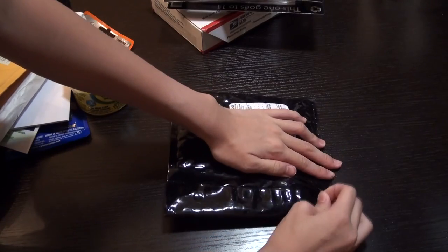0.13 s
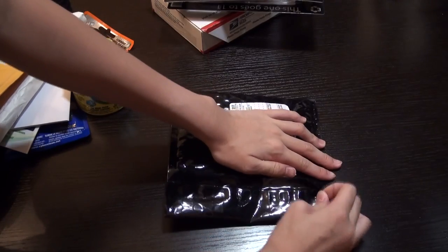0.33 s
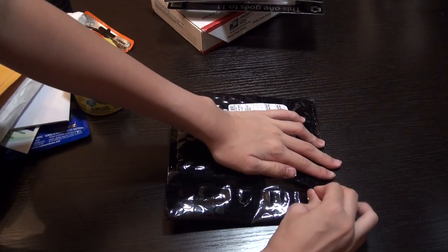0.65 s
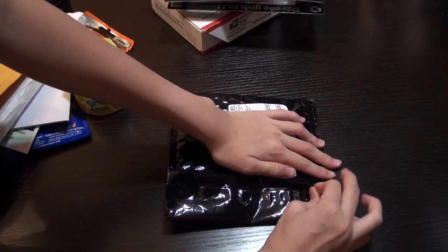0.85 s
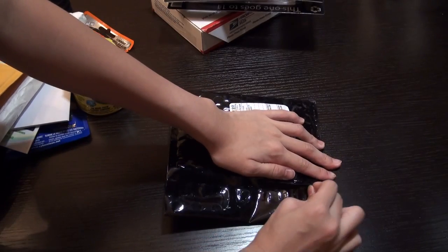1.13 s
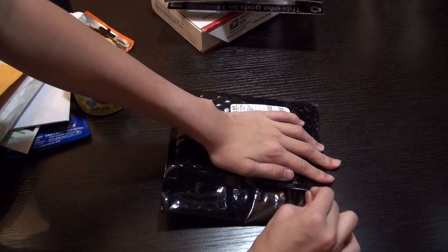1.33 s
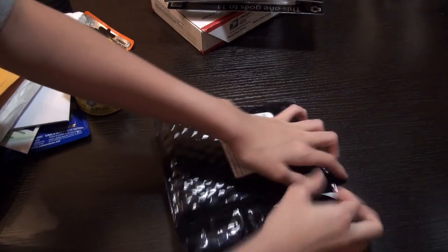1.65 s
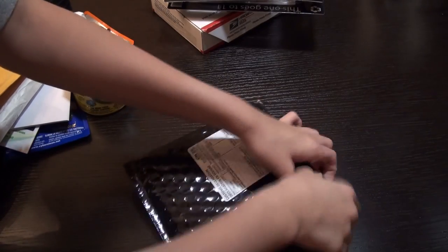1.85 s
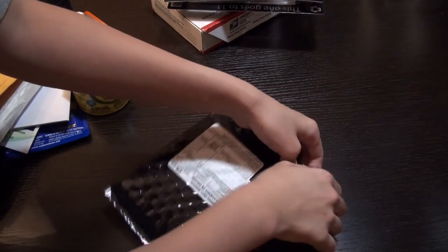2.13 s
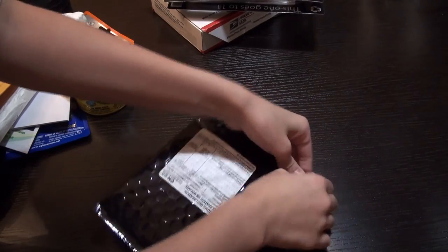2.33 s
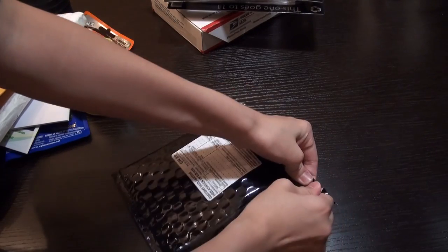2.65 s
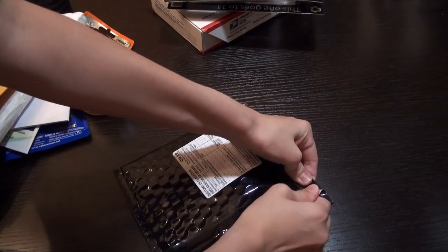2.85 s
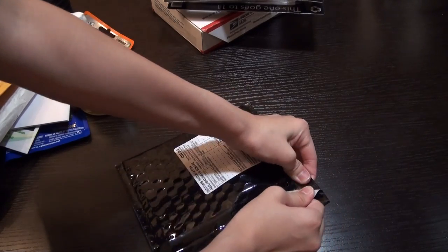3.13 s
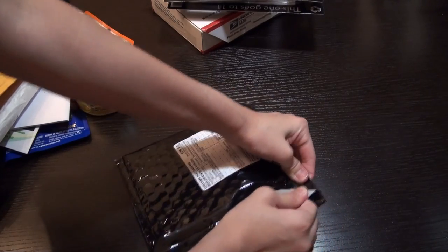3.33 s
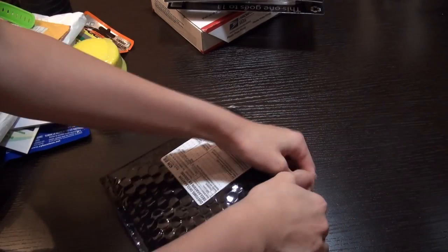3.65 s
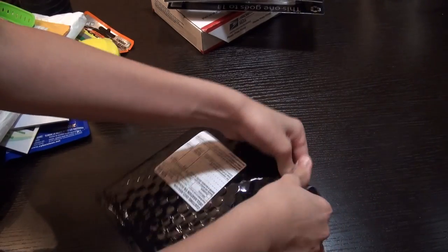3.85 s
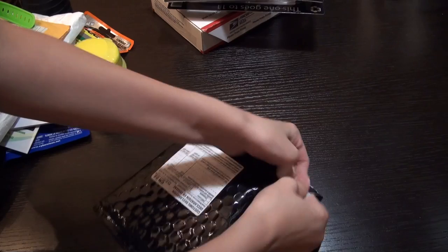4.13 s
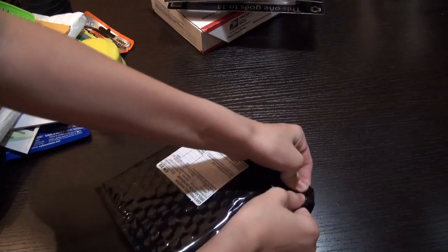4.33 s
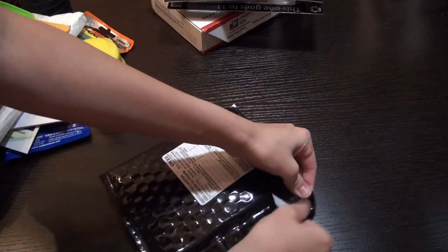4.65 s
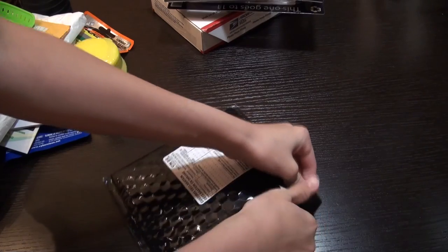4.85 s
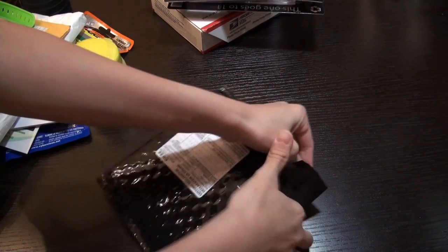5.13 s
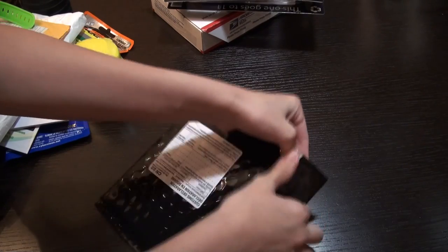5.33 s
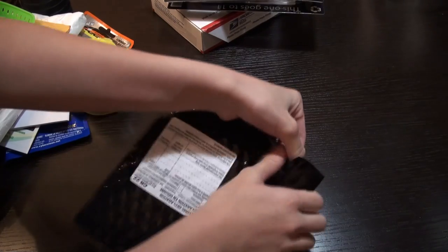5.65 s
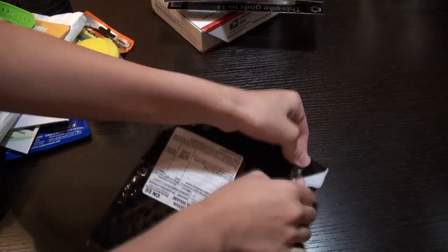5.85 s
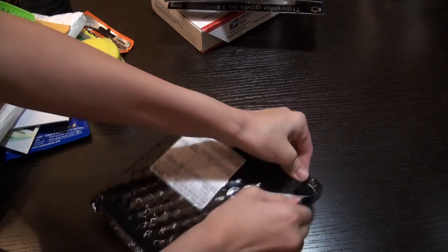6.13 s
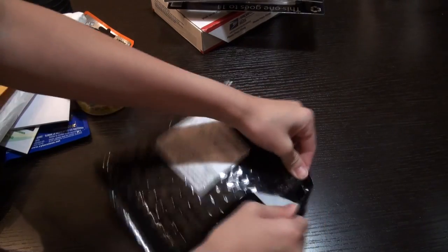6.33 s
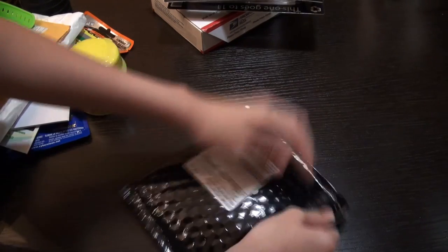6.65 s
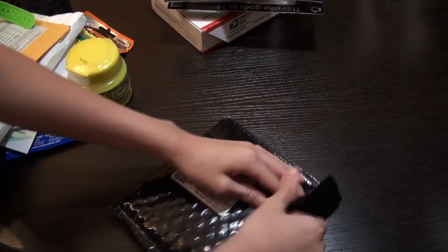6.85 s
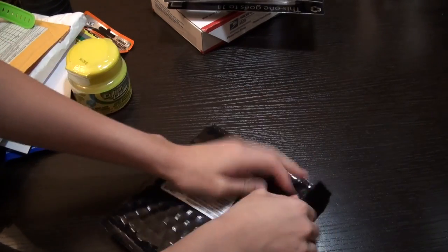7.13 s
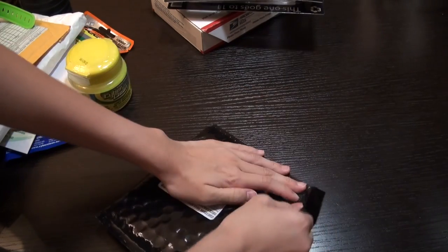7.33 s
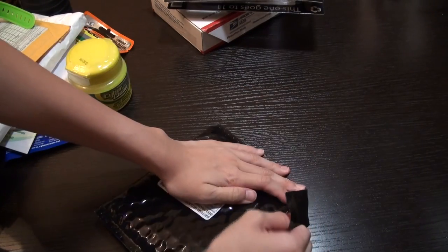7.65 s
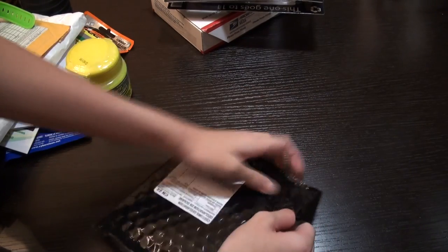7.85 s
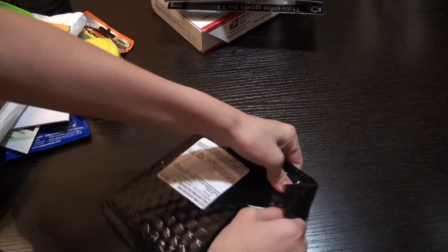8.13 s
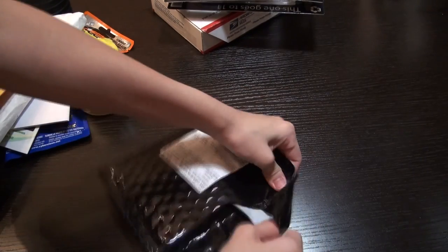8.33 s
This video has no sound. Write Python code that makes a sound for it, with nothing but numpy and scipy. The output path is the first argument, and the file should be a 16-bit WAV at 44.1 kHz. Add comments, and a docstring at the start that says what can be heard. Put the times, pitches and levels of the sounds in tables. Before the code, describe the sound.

Hands pull at a padded plastic envelope, making sharp crackles, short rips and soft desk bumps above a faint room hum.

```python
"""Plastic film rustles over a faint hum and hiss as hands pull and tear a bubble mailer on a desk.
The rustle is thousands of tiny creases, merging into a rip under hard tugs. The bag thumps the desk.
Larger creases snap one by one: a sharp edge, a flex of the film, a ring of the air-filled pouch.
The desk top and a small room answer. The microphones are close; the right one is weak."""
import sys
import numpy as np
from scipy import signal
from scipy.fft import rfft, irfft
from scipy.io import wavfile
from scipy.ndimage import uniform_filter1d

SR = 44100
rng = np.random.default_rng(int(sys.argv[2]) if len(sys.argv) > 2 else 0)


def transcribe(signal):
    """Save signal, clipped to [-1, 1], as a 16-bit WAV file at the path in sys.argv[1]."""
    frames = np.atleast_2d(signal).T
    limited = np.clip(frames, -1, 1)
    pcm = np.round(limited * 32767).astype(np.int16)
    wavfile.write(sys.argv[1], SR, pcm)


N = 374850


def amp(db):
    return 10 ** (np.asarray(db) / 20)


def decay(t, t60_s):
    return amp(-60 * t / t60_s)


def unit_rms(x):
    return x / np.sqrt(np.mean(x ** 2) + 1e-20)


def curve_at(points, hz):
    """Interpolates (hz, value) points over log frequency."""
    point_hz, value = np.transpose(points)
    return np.interp(np.log(hz + 1), np.log(point_hz + 1), value)


def coloured(x, spectrum):
    """Minimum-phase filter of unit energy."""
    log_gain = np.log(amp(curve_at(spectrum, abs(np.fft.fftfreq(4096, 1 / SR)))))
    taps = np.fft.ifft(np.exp(log_gain - 1j * signal.hilbert(log_gain).imag)).real[:1024]
    taps = taps / np.linalg.norm(taps)
    return signal.oaconvolve(np.atleast_2d(x), taps[None], axes=1)[:, :x.shape[-1]].squeeze()


def burst(level_db, x):
    """Scales x to the energy of 3 ms at level_db."""
    return amp(level_db) * x * np.sqrt(.003 * SR) / np.linalg.norm(x)


# Fingers working the film: time_s, level_db, pouch_rel_db, edge_rel_db
HANDLING = [(0, -51, -4, -5), (.4, -62, 3, -14), (.73, -66, 3, -5), (1.08, -55.5, 0, -6),
            (1.24, -62.5, 2, -11), (1.8, -50.5, 2.5, -6.5), (2.3, -61.5, 5, -5), (2.53, -45, -2.5, -4),
            (2.93, -62, -1.5, -3.5), (3.2, -63, 1.5, -6), (3.76, -53.5, 0.5, -9), (4.07, -64, 0.5, -9),
            (4.45, -48, -13, -6.5), (4.7, -67.5, 7, -16), (5.09, -53.5, -3, -3.5), (5.75, -60.5, 4, -6),
            (6.08, -47.5, 0.5, -3.5), (6.42, -47, 1.3, -8), (6.72, -61, 2.5, -6), (6.95, -61, 4, -5),
            (7.45, -52, 2.5, -2), (7.8, -56, 6.5, -3.5), (8.21, -54, -1.5, -6), (8.5, -36.5, -3, -8)]
# Tugs that drag or rip the film: start_s, length_s, peak_db, pouch_rel_db, edge_rel_db
TUGS = [(0.445, 0.013, -55, 2, 8.5), (1.583, 0.054, -43.5, 4.5, 2), (1.857, 0.056, -44.5, 4, -9),
        (1.976, 0.051, -42, -8, -4.5), (2.298, 0.066, -45.5, 5, -14), (2.46, 0.053, -49, 1, -7),
        (2.58, 0.11, -48.5, 1.5, -7), (3.473, 0.19, -49.5, -2, -1), (3.875, 0.039, -53, 0, -0.5),
        (4.153, 0.18, -43.5, 2, 6), (4.478, .07, -38.5, -1, -1), (4.883, 0.052, -43.5, -1, 2.5),
        (5.296, 0.042, -53.5, 7.5, -4), (5.463, 0.13, -42.5, 5, -24), (5.828, 0.078, -46.5, 6, 5),
        (6.207, .11, -30, 3.5, -1.5), (6.502, 0.087, -39.5, 1.5, -3), (6.801, 0.025, -42.5, 3, -3),
        (7.19, 0.14, -47.5, -4, -4), (7.476, 0.036, -49.5, 2, 1.5), (7.62, 0.055, -49, -12, 0),
        (7.855, 0.087, -44.5, 4.5, -2), (8.068, 0.053, -43.5, 1.5, -6), (8.282, 0.035, -41.5, 7, 2),
        (8.374, 0.095, -33.5, 2.5, 0.5)]
def handling_levels(swell_db=23, slacken_db_per_s=263, settle_rel_db=-23, settle_db_per_s=160):
    """Film, pouch and edge levels in dB: fingers, tugs and settling after snaps add in power."""
    t = np.arange(0, N + 64, 64) / SR
    time_s, level_db, pouch_rel_db, edge_rel_db = np.transpose(HANDLING)
    power = amp([np.interp(t, time_s, level_db + rel) for rel in (0, pouch_rel_db, edge_rel_db)]) ** 2
    for start_s, length_s, peak_db, pouch_rel_db, edge_rel_db in TUGS:
        to_go = 1 - (t - start_s) / length_s
        shape_db = np.where(to_go > 0, -swell_db * to_go ** 2, slacken_db_per_s * length_s * to_go)
        parts_db = peak_db + shape_db + np.vstack([0, pouch_rel_db, edge_rel_db])
        power += amp(np.maximum(parts_db, -200)) ** 2
    for start_s, level_db, pouch_rel_db, edge_rel_db, _ in SNAPS:
        settling_db = level_db + settle_rel_db - settle_db_per_s * abs(t - start_s)
        power += (t > start_s) * amp(settling_db + np.vstack([0, pouch_rel_db, edge_rel_db])) ** 2
    return [np.interp(np.arange(N) / SR, t, 10 * np.log10(part)) for part in power]


# Spectra of flexing film, air-filled pouch and a crease's sharp edge: freq_hz, gain_db
FILM = [(1800, -12.5), (2800, 4.5), (3800, 5.5), (5500, 2), (8000, -5.5), (16000, -22.5)]
POUCH = [(60, -45), (200, -39.5), (400, -12.5), (800, -5.5), (1250, 2.5), (2200, -1), (3200, -9),
         (8000, -86)]
EDGE = [(3000, -42), (5000, -0.5), (7000, 2), (10000, 3.5), (13000, 0.5), (16500, -17)]
def rustle(rip_db=-45, rub_share=0.61):
    """Tiny creases of uneven size, in clumps; hard handling merges them into an even rip."""
    film_db, pouch_db, edge_db = handling_levels()
    creases_per_s = np.clip(1100 * amp(0.56 * (film_db + 50.5)), 120, 30000)
    unevenness = 1 - .8 / (1 + amp(3 * (rip_db - film_db)))
    clumps = 5 * unit_rms(uniform_filter1d(rng.standard_normal(N), size=500))
    spread = 4.5 * (np.minimum(rng.exponential(1, N), 3.1) - 1.5)
    size = amp(unevenness * (spread + clumps))
    ticks = size * (rng.random(N) < creases_per_s / SR) / np.sqrt(creases_per_s)
    parts = (FILM, film_db, .003), (POUCH, pouch_db, .005), (EDGE, edge_db, .002)
    out = 0
    for spectrum, level_db, t60_s in parts:
        part_ticks = ticks * amp(5.9 * unevenness * rng.standard_normal(N))
        envelope = signal.lfilter([1], [1, -decay(1 / SR, t60_s)], part_ticks)
        crackle = envelope * rng.standard_normal(N)
        rub = rub_share * rng.standard_normal(N) * np.std(crackle)  # skin sliding on film
        out += amp(level_db) * unit_rms(coloured(crackle + rub, spectrum))
    return out


def wander(top_hz):
    """Slow random curve, rms 1."""
    t = np.arange(0, N + 400, 400) / SR
    rates_hz = np.geomspace(.4, top_hz, num=16)
    slow = sum(np.sin(2 * np.pi * (hz * t + rng.random())) / np.sqrt(hz) for hz in rates_hz)
    return np.interp(np.arange(N) / SR, t, unit_rms(slow))


# Hum tones: pitch_hz, rms_db
HUM_TONES = [(54.5, -67.5), (76.7, -98), (97.6, -98), (101.6, -62.5), (108.3, -60), (130.5, -68)]
def hum(waver_db=1.5, drift_hz=.35):
    """Low tones that beat against each other and waver a little."""
    out = 0
    for pitch_hz, rms_db in HUM_TONES:
        peak = np.sqrt(2) * amp(rms_db + waver_db * wander(2.9))
        cycles = np.cumsum(pitch_hz + drift_hz * wander(4.0)) / SR
        out += peak * np.sin(2 * np.pi * cycles)
    return out


# Noise floor spectrum: freq_hz, density_db
HISS_SPECTRUM = [(32, -9), (42, -12), (110, 1), (190, -10.5), (870, -12), (1200, -15), (2000, -17),
                 (5900, -21), (10700, -26), (15700, -31), (17000, -32)]
# Left-right likeness of the hiss: freq_hz, correlation
HISS_CORRELATION = [(60, 0.52), (240, 0.64), (1000, 1), (15000, 0.38)]
def hiss(level_db=-54.5):
    """Steady room and microphone noise, partly shared by both channels."""
    hz = np.fft.rfftfreq(N, 1 / SR)
    left, independent = rfft(rng.standard_normal((2, N)))
    correlation = curve_at(HISS_CORRELATION, hz)
    right = correlation * left + np.sqrt(1 - correlation ** 2) * independent
    shaped = np.array([left, right]) * amp(curve_at(HISS_SPECTRUM, hz))
    return amp(level_db) * unit_rms(irfft(shaped, N))


# Knock spectrum of the desk top: freq_hz, gain_db
DESK = [(90, -10), (180, -6.5), (380, -1.5), (600, 3.5), (1200, -17)]
# Jerks of the bag against the desk: start_s, level_db
THUMPS = [(0.0084, -44), (0.1443, -30.5), (0.9157, -27), (1.605, -31), (1.6248, -43.5), (3.641, -30.5),
          (4.1235, -37.5), (5.1734, -23.5), (5.5873, -36), (5.93, -33), (6.2462, -30), (6.266, -37),
          (6.4962, -28.5), (6.5618, -33), (6.594, -39), (7.937, -29), (8.436, -38)]
def thumps(t60_s=.014):
    """The padded bag pushes softly into the desk top for a few milliseconds."""
    t, out = np.arange(900) / SR, np.zeros(N + 900)
    pushes = coloured(decay(t, t60_s) * rng.standard_normal((len(THUMPS), len(t))), DESK)
    fade_out = signal.windows.tukey(2 * len(t), .5)[len(t):]
    for (start_s, level_db), push in zip(THUMPS, pushes):
        out[round(start_s * SR):][:len(t)] += burst(level_db, push * fade_out)
    return out[:N]


# Creases that snap clearly: start_s, level_db, pouch_rel_db, edge_rel_db, pouch_pitch_hz
SNAPS = [(0.0111, -21.5, -1, -0.5, 1260), (0.144, -25, -1.5, 0, 1030), (0.1645, -28, -4, 0, 2110),
         (0.1682, -31, -4.5, 8.5, 735), (0.1942, -45, 14, -12, 1210), (0.218, -31.5, -7, -2, 1450),
         (0.2538, -32.5, -4, -2, 1790), (0.2634, -41.5, 5, 6, 1730), (0.332, -26.5, -1.5, 0.5, 1600),
         (0.345, -41, 3, 14, 1520), (0.3624, -34, -11, -2, 1540), (0.4913, -42, -4, -14, 1190),
         (0.524, -53.5, 7, -11, 1390), (0.5546, -44.5, 3, -4, 1430), (0.6101, -35.5, -11, -6, 1420),
         (0.789, -35, -6, -31, 1510), (0.9169, -22.5, 1.5, 0, 2010), (1.0961, -43.5, -2, -5, 1410),
         (1.1576, -44.5, 0, -7, 1380), (1.207, -55, 13.5, -19, 1224), (1.286, -42.5, 0, -3, 1400),
         (1.3041, -42, 8.5, 2, 1440), (1.415, -33, 4, -12, 1490), (1.4425, -34.5, 5.5, -5, 1460),
         (1.4679, -37.5, 7.5, -3.5, 1480), (1.5525, -39, 4, -12, 1280), (1.6052, -27, 5.5, -17, 1450),
         (1.6259, -29.5, 7, -21, 1600), (1.631, -28, -7, -14, 2010), (1.7406, -32.5, 1, -7.5, 1380),
         (1.7994, -30.5, 5.5, 3.5, 1430), (1.9948, -33.5, 5, -7, 1740), (2.0601, -38.5, 10.5, -4, 1770),
         (2.0666, -33, 3.5, -4, 1780), (2.349, -47, 14, -4, 1280), (2.3599, -39, 10, -27, 2430),
         (2.3912, -38.5, 4, -20, 1570), (2.469, -24.5, 2.5, -18, 2480), (2.499, -40, 11, -22, 1310),
         (2.5131, -37, 7.5, -24, 2470), (2.5167, -27, -2, -23, 2700), (2.5633, -44.5, 14.5, -10, 1540),
         (2.6074, -27.5, -2, 7.5, 2630), (2.7374, -39.5, -8, -11, 1390), (2.9315, -48, -4, 6, 1520),
         (3.0925, -31.5, 1.5, 2.5, 1290), (3.23, -46.5, -6, -6, 1400), (3.245, -48.5, 5, -14, 1370),
         (3.279, -42, -25, -24, 2500), (3.366, -43, -1, 5.5, 1730), (3.56, -33.5, 3, -5, 1550),
         (3.642, -31, 8, -3, 1320), (3.7363, -42, -9, 4.5, 2500), (4.0124, -47, 8.5, -1, 1250),
         (4.081, -59.5, 23.5, -10, 1180), (4.11, -62, 22, -10, 1250), (4.1236, -55, 20, -9, 1200),
         (4.2256, -42.5, 4, 0, 1220), (4.2604, -44, 4.5, 8, 1380), (4.2735, -42.5, -13, 21.5, 1400),
         (4.2932, -43, -15, 22.5, 1410), (4.297, -34, -8, 11.5, 2020), (4.305, -32.5, -0.5, 7.5, 2000),
         (4.3431, -39.5, 5.5, -15, 1170), (4.394, -29.5, 0.5, -25, 1390), (4.4395, -44, -3, 3, 1310),
         (4.4576, -29, -1.5, 1, 1560), (4.5047, -28, 8, -19, 1214), (4.5205, -20, -9, -10, 2640),
         (4.5278, -22, -7, -14, 1330), (4.5424, -26.5, 1.5, 1, 1650), (4.622, -48.5, 17.5, -12, 1210),
         (4.7833, -25, -5, -11, 1970), (4.8056, -35.5, 8, 0.5, 1130), (4.8098, -31, 1, -12, 1410),
         (4.8729, -35, 3.5, -9, 1150), (4.8981, -28.5, 8, 5, 1300), (4.9007, -26.5, -4.5, 1, 1410),
         (4.973, -32.5, -2, -8, 890), (5.0123, -40, 15.5, -20, 1150), (5.0628, -43, 2, -16, 2100),
         (5.1735, -27.5, 5.5, -23, 1330), (5.1776, -22, -10.5, -14, 1380), (5.3337, -37.5, -1, -8, 830),
         (5.4888, -49, 11, -18, 1290), (5.547, -43.5, 14.5, -31, 2250), (5.5737, -28, -9, -23, 1070),
         (5.5923, -31.5, 5.5, -20, 1660), (5.6672, -49.5, 13, 0, 1060), (5.8675, -30.5, 2, -3, 1670),
         (5.9026, -39, 8.5, 1, 1200), (5.9171, -28, -1, -9, 1250), (5.93, -29.5, -7, 6, 2370),
         (5.945, -34.5, 7.5, -7, 1960), (6.0395, -34, -1.5, -21, 1320), (6.125, -37, 3, -6, 1520),
         (6.1518, -35, 6.5, -3, 1310), (6.2207, -29, 0.5, -2.5, 1240), (6.2493, -44, 20, -9, 1190),
         (6.2558, -20.5, 1, -3, 1180), (6.2625, -29.5, 9, -10, 1410), (6.264, -24, 5, -1.5, 1090),
         (6.4596, -35.5, 0.5, 3.5, 1060), (6.472, -39, 4, -5, 1400), (6.5002, -35.5, 7, -15, 1520),
         (6.5134, -44, 13, -3, 1490), (6.531, -36.5, -1, 4, 1490), (6.5578, -33.5, -1, 6, 2320),
         (6.5613, -26, -1, 4, 2400), (6.5708, -30, -13, 3.5, 1220), (6.596, -47, 11, -5, 1150),
         (6.8449, -44, 10, 3, 1330), (6.9727, -54, 16, -28, 1110), (7.0002, -44, -1.5, -11, 1820),
         (7.1085, -37.5, 0.5, -10, 1220), (7.2316, -40, -1.5, -12, 1400), (7.274, -40.5, 3, -3, 1180),
         (7.2964, -34, 3, -2.5, 1270), (7.4273, -40.5, 5.5, -5, 1180), (7.5141, -43, 6.5, 3, 1620),
         (7.5659, -55.5, 23, 2, 1160), (7.6244, -25.5, 5, -4, 1255), (7.633, -28.5, 5.5, 2, 1060),
         (7.8703, -38, 8, -5, 1280), (7.937, -28.5, 4, -12, 1070), (8.046, -39, 10, -35, 1700),
         (8.1537, -33.5, 0, -20, 1320), (8.24, -49.5, 13.5, 5, 1920), (8.2955, -24.5, 4.5, -16, 1770),
         (8.3162, -23.5, 3.5, -0.5, 1190), (8.3509, -32, 6.5, 0, 1610), (8.365, -40, 11, -25, 2120),
         (8.3925, -39, -1, 3, 1750), (8.3988, -32.5, 4, 0, 965), (8.4116, -28, 9, 4, 1280),
         (8.4352, -20.5, 2, -8, 1170), (8.4944, -29, 2, -6, 2100)]
def snaps():
    """A crease lets go at once: bright edge, flex of the film, short ring of the pouch."""
    t, out = np.arange(900) / SR, np.zeros(N + 900)
    edge_noise, film_noise, pouch_noise = rng.standard_normal((len(SNAPS), 3, len(t))).swapaxes(0, 1)
    # a spike, then the neighbouring film settles
    edges = coloured((decay(t, .003) + .2 * decay(t, .04)) * edge_noise, EDGE)
    films = coloured((decay(t, .0019) + .25 * decay(t, .054)) * film_noise, FILM)
    films /= np.linalg.norm(films, axis=1, keepdims=True)
    patch_hz = 2600 * 2.41 ** rng.random((len(SNAPS), 1))  # each patch of film has its own pitch
    films += .11 * decay(t, .011) * np.sin(2 * np.pi * patch_hz * t)
    pouch_envelope = decay(t, .009) * (1 - np.exp(-t / .0005))
    puffs = coloured(pouch_envelope * pouch_noise, POUCH)
    for row, edge, film, puff in zip(SNAPS, edges, films, puffs):
        start_s, level_db, pouch_rel_db, edge_rel_db, pouch_pitch_hz = row
        ring = pouch_envelope * np.sin(2 * np.pi * pouch_pitch_hz * t)
        pouch = burst(level_db + pouch_rel_db, unit_rms(puff) + 1.07 * unit_rms(ring))
        snap = burst(level_db + edge_rel_db, edge) + burst(level_db, film) + pouch
        out[round(start_s * SR):][:len(t)] += snap
    return out[:N]


# Room decay: freq_hz, t60_s
ROOM_DECAY = [(300, 0.68), (1200, 0.22), (4000, 0.25), (10000, 0.26), (16000, 0.12)]
# Reflection off the desk top: delay_s, gain_db
DESK_ECHOES = [(.0041, -18)]
def room(x, wet_db=-11.5):
    """Direct sound, desk echo, then sparse reflections dying band by band, different on each side."""
    taps = np.zeros((2, SR // 2))
    slots = np.arange(200, SR // 2 - 20, 20)
    arrivals = slots + rng.integers(0, 20, (2, len(slots)))
    np.put_along_axis(taps, arrivals, rng.choice([-1., 1.], arrivals.shape), 1)
    hz, t, bands = signal.stft(taps, SR, nperseg=256)
    _, response = signal.istft(bands * decay(t, curve_at(ROOM_DECAY, hz)[:, None]), SR, nperseg=256)
    response *= amp(wet_db) / np.linalg.norm(response, axis=1, keepdims=True)
    response[:, 0] += 1  # direct sound
    for delay_s, gain_db in DESK_ECHOES:
        response[[0, 1], round(delay_s * SR) + np.array([0, 5])] += amp(gain_db)  # later on the right
    return signal.fftconvolve(x[None], response, axes=1)[:, :N]


def scene(low_cut_hz=140):
    """The mailer in the room, its deep bass filtered out, over hum and hiss."""
    low_cut = signal.butter(3, low_cut_hz, "high", fs=SR, output="sos")
    mailer = signal.sosfilt(low_cut, snaps() + thumps() + rustle())
    return room(mailer) + hum() + hiss()


# Right microphone relative to left: freq_hz, gain_db
RIGHT_MIC = [(60, -23), (130, -23.5), (240, -13), (950, -10.5), (4000, -12), (8000, -12), (12000, -6.5),
             (15200, -41), (15900, -45)]
def record(dry, band_limit_hz=16600):
    """Weak right microphone, weakest in the bass and extreme treble; both channels band-limited."""
    right_gain = amp(curve_at(RIGHT_MIC, np.fft.rfftfreq(N, 1 / SR)))
    right = irfft(rfft(dry[1]) * right_gain, N)
    low_pass = signal.firwin(301, band_limit_hz, window=("kaiser", 5), fs=SR)
    return signal.oaconvolve(np.array([dry[0], right]), low_pass[None], "same")


dry = scene()
out = record(dry)
transcribe(out)
```